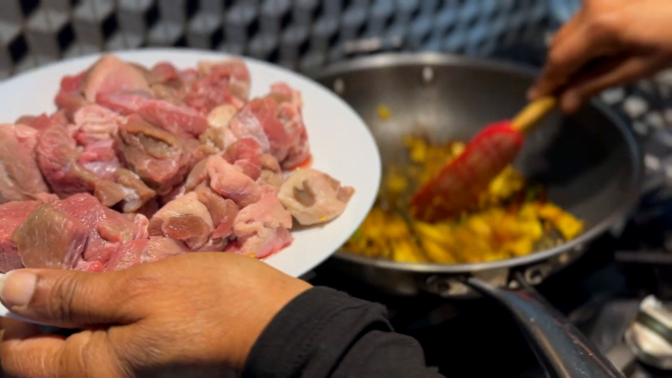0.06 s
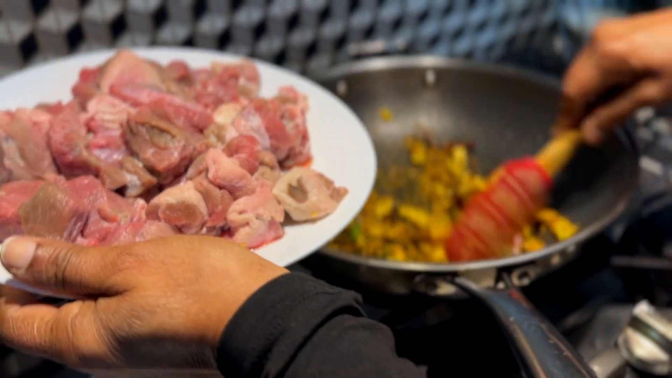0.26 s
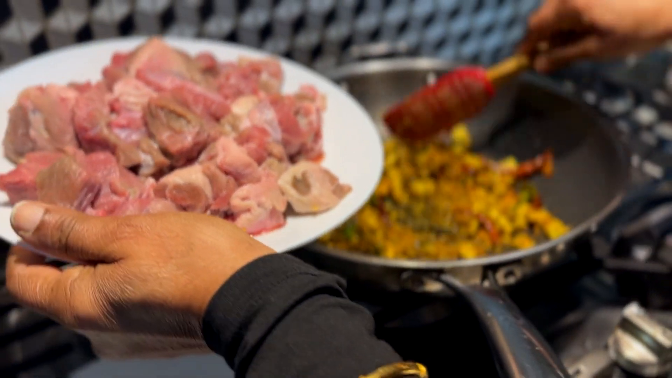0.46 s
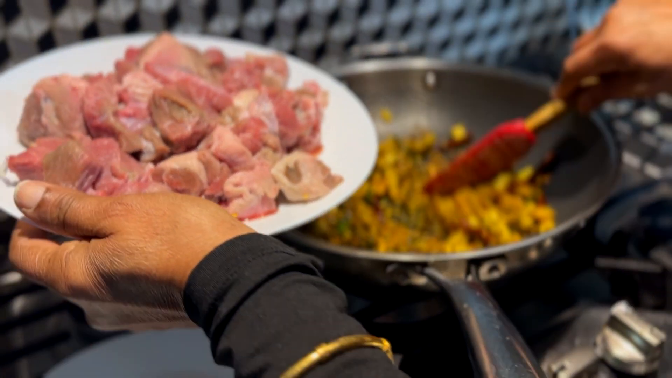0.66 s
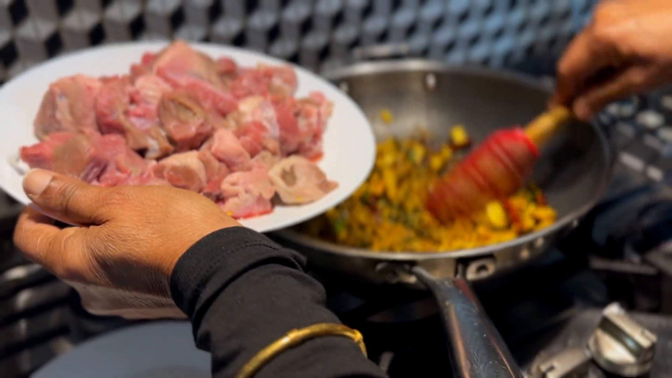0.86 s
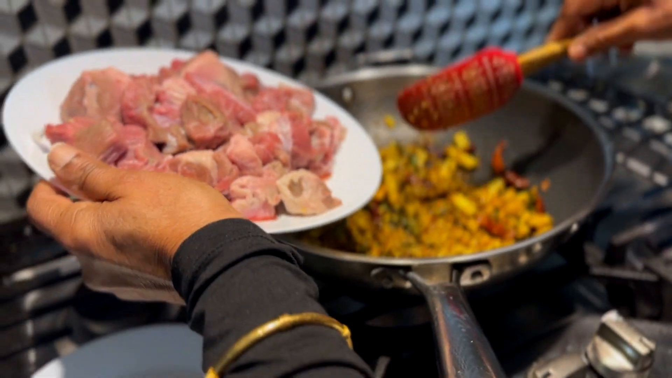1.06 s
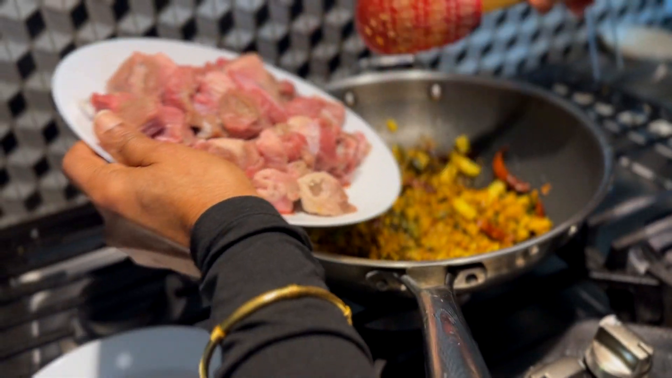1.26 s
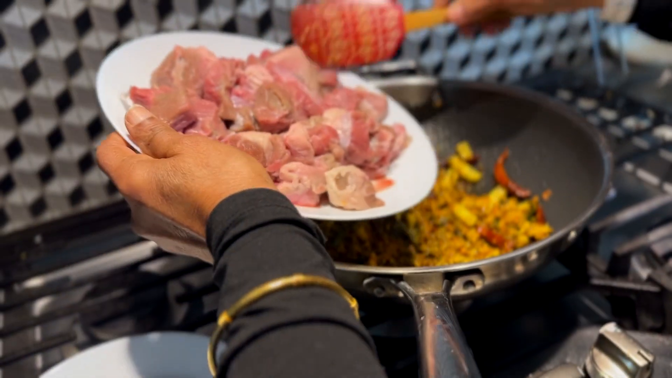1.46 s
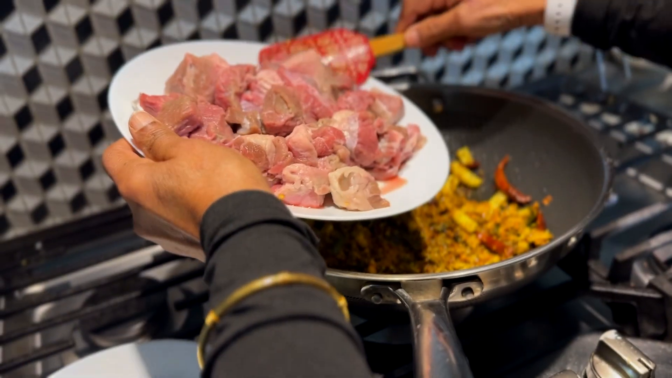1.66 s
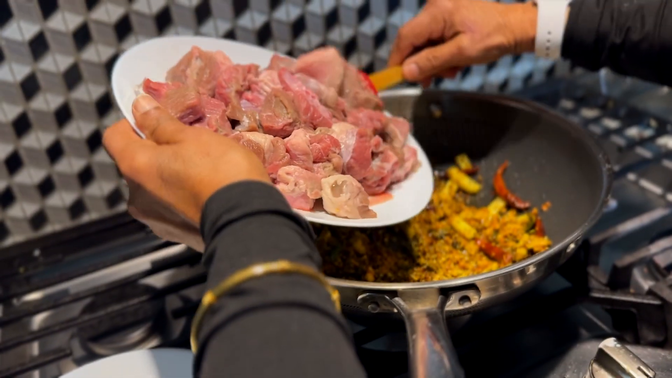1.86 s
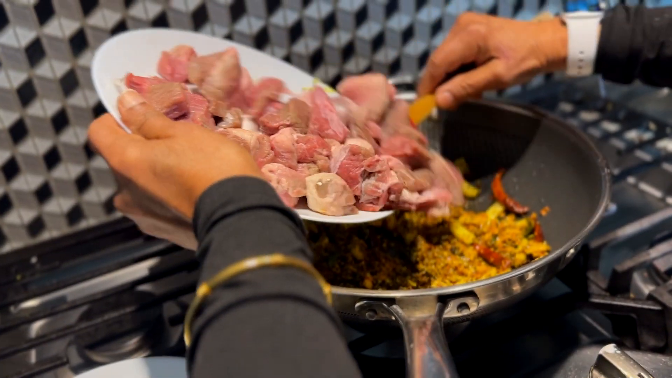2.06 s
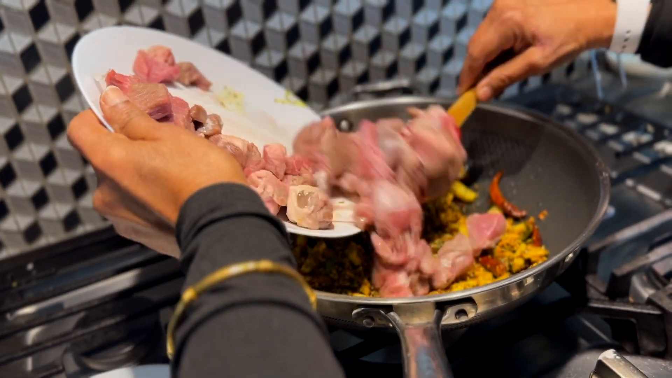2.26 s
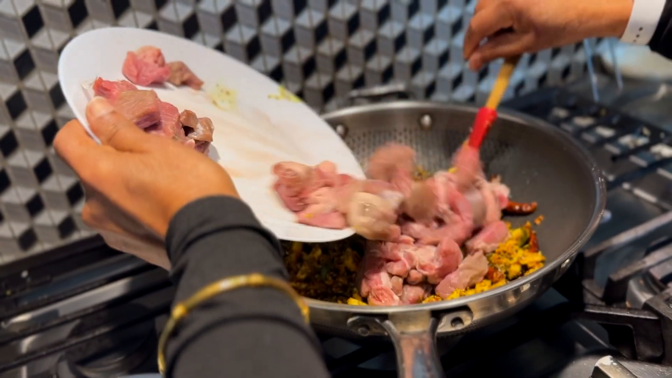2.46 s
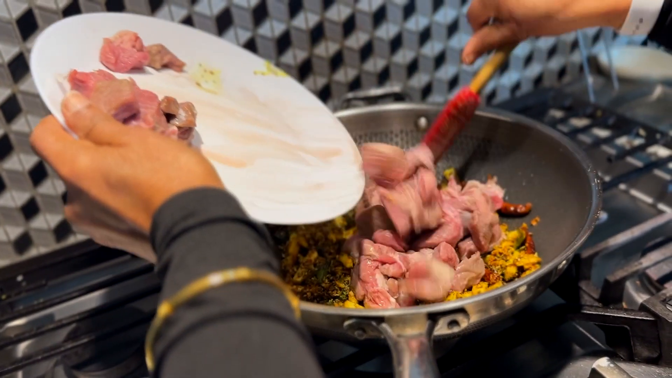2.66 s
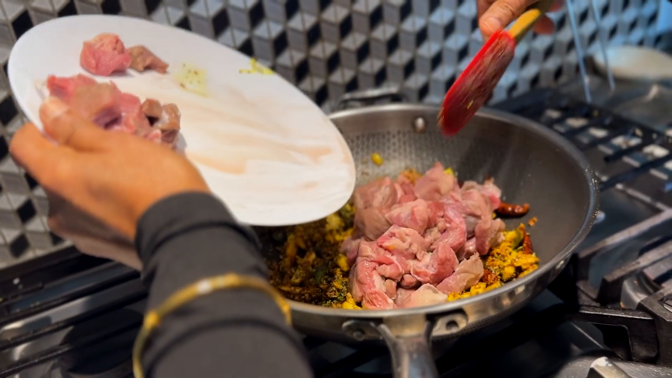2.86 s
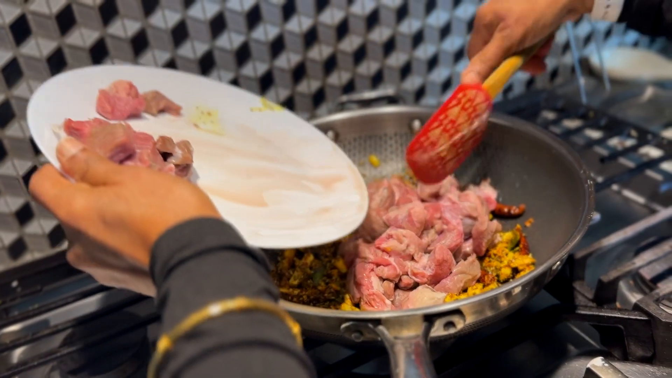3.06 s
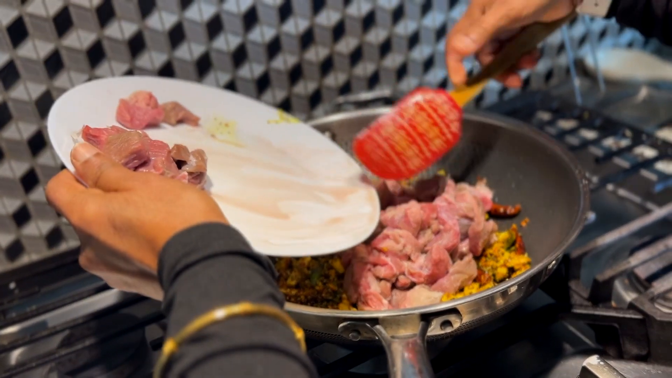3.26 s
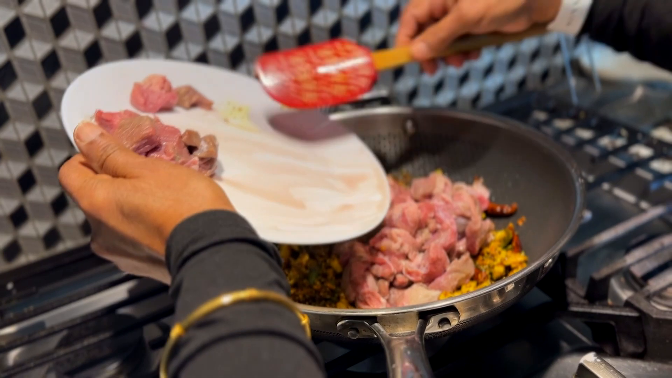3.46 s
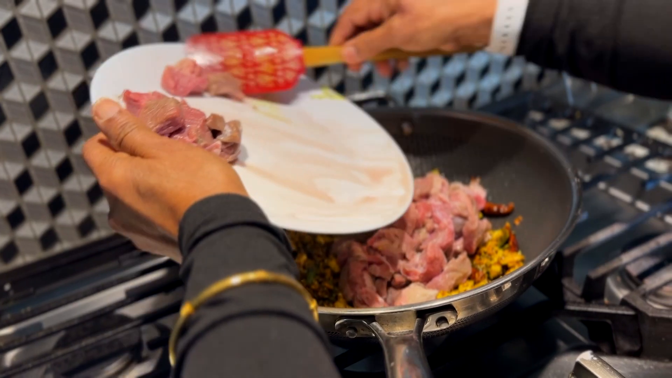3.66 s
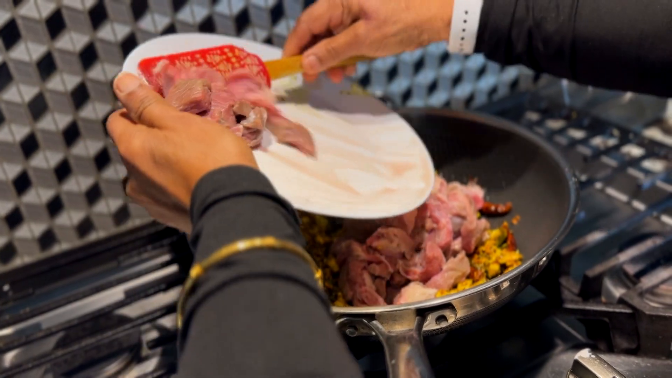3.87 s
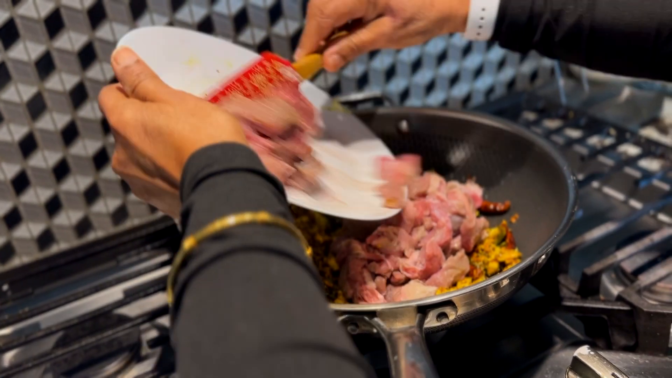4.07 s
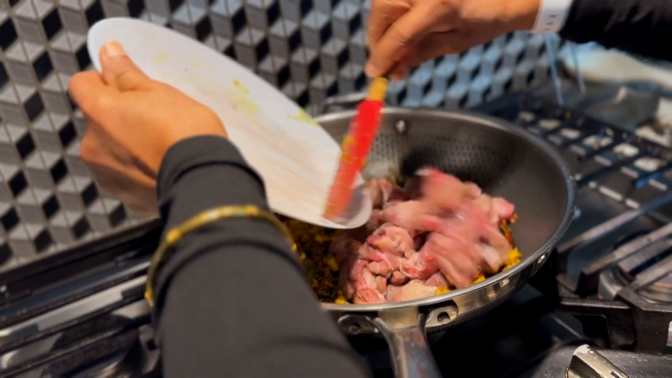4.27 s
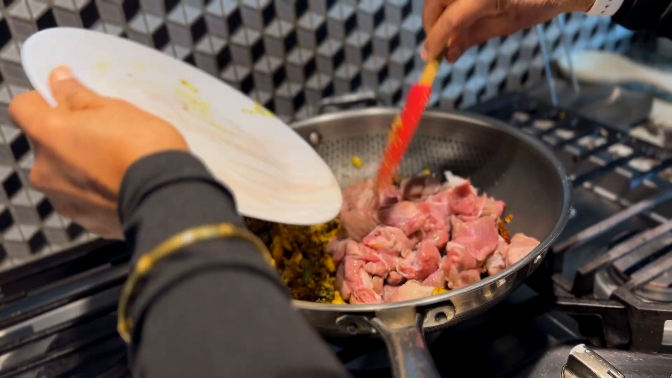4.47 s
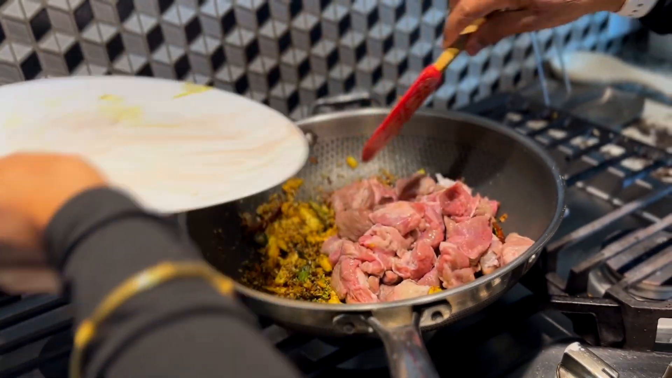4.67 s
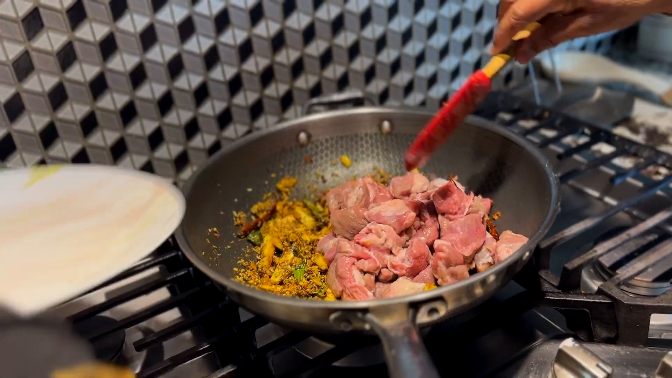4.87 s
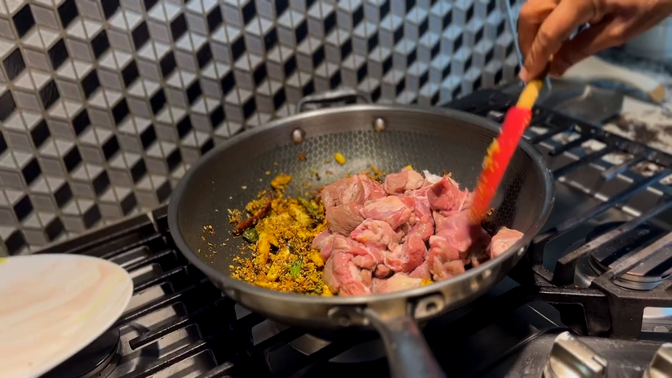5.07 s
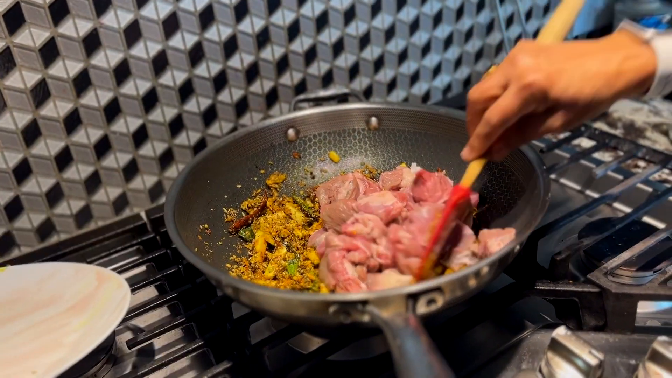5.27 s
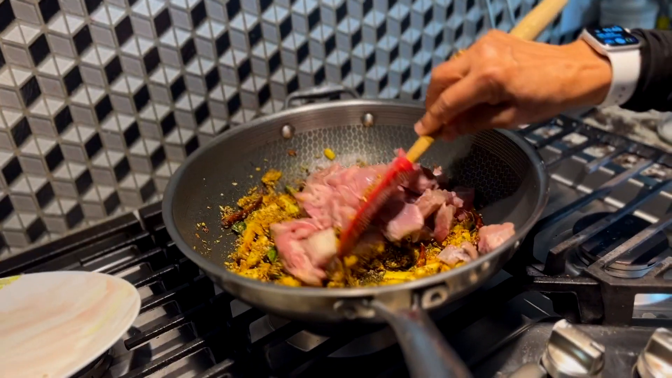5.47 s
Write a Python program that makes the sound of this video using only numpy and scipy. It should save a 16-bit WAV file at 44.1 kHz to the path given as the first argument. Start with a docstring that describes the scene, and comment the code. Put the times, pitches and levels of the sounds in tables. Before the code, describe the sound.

A low oily crackle with stirring strokes and a brief steam whistle swells abruptly into strong, steady frying over a faint kitchen fan.

```python
"""Spices sizzle in an oily pan; wet meat slides in and the sizzle grows loud and dense.
The sizzle is five sizes of bursting steam bubbles over hiss; a spatula stirs, rubs and catches on the pan.
Droplets spit with a click and a hiss, soft lumps thud, and steam whistles from a pocket as a wavering tone.
The pan rumbles on its grate; an extractor fan rushes and hums. One microphone feeds both channels."""
import sys
import numpy as np
from scipy import signal
from scipy.fft import rfft, irfft, next_fast_len
from scipy.io import wavfile
from scipy.ndimage import uniform_filter1d, map_coordinates

SR = 44100
rng = np.random.default_rng(int(sys.argv[2]) if len(sys.argv) > 2 else 0)


def bounce(signal):
    """Save signal as a 16-bit WAV file at the path given by the first command-line argument."""
    frames = np.transpose(np.atleast_2d(signal))
    limited = np.clip(frames, -1, 1)
    pcm = np.round(limited * 32767).astype(np.int16)
    wavfile.write(sys.argv[1], SR, pcm)


N = 243599  # length [samples]
TIME_S = np.arange(N) / SR


def amp(db):
    """Gain of a dB value."""
    return 10 ** (np.asarray(db) / 20)


def unit(x):
    """x scaled to an rms of 1."""
    return x / np.sqrt(np.mean(x ** 2) + 1e-20)


def along(points, hz):
    """Read a curve of (Hz, value) points on a log frequency axis."""
    point_hz, value = np.transpose(points)
    return np.interp(np.log(hz + 1), np.log(point_hz + 1), value)


def curves(rows):
    """One value per sample for each column after the time."""
    s, *columns = np.transpose(rows)
    return [np.interp(TIME_S, s, column) for column in columns]


def wobble(rate):
    """A smooth random curve with rate random points a second."""
    points = rng.standard_normal(int(N * rate / SR) + 4)
    return map_coordinates(points, [np.arange(N) * rate / SR])


def filtered(x, response):
    """x shaped by a response, which is a function of frequency."""
    size = next_fast_len(N + SR // 2)
    spectrum = rfft(x, size) * response(np.fft.rfftfreq(size, 1 / SR))
    return irfft(spectrum, size)[..., :N]


def resonance(f, hz, width_hz):
    """A body that rings at one pitch: a causal band-pass of peak gain 1."""
    return 1j * f * width_hz / (hz * hz - f * f + 1j * f * width_hz)


def add(track, s, sound):
    """Mix sound into track from time s."""
    track[round(s * SR):][:len(sound)] += sound


def patchy(depth_db, streak_db=0, sound=None):
    """Noise (or sound) with broad brief patches of strength, and narrow lasting streaks."""
    source = rng.standard_normal(N) if sound is None else sound
    z = signal.stft(source, nperseg=512)[2]

    def field(bins, frames):
        """Random strengths, smoothed over frequency bins and time frames."""
        over_pitch = uniform_filter1d(rng.standard_normal(z.shape), bins, 0)
        return unit(uniform_filter1d(over_pitch, frames, 1))

    gain_db = depth_db * field(bins=14, frames=6) + streak_db * field(bins=1, frames=30)
    return signal.istft(z * amp(gain_db), nperseg=512)[1][:N]


def bubbles(count, pitch_hz, spread, cycles, size_db):
    """Bursting bubbles: damped sines of scattered pitch; size_db above 0 makes a few louder than most."""
    start = rng.integers(0, N, count)[:, None]
    hz = pitch_hz * np.exp(spread * rng.standard_normal((count, 1)))
    hz = np.minimum(hz, SR / 2.5)
    size = amp(size_db * np.minimum(rng.exponential(1, (count, 1)), 6))
    size = size * rng.choice([-1, 1], (count, 1))
    k = np.arange(96)  # samples in one burst
    turns = hz * k / SR
    grain = size * np.sin(2 * np.pi * turns) * np.exp(-turns / cycles)
    return np.bincount((start + k).ravel(), grain.ravel())[:N]


# How hard the pan fries:
# (time [s], big bubbles in the bowl [dB], fizz before its split [dB], fine spray [dB])
FRYING = [(0, -44.5, -40, -45), (1.0, -47.5, -40, -40), (1.5, -49, -40, -45), (2.1, -48.5, -42, -45),
          (2.24, -47, -37, -43.5), (2.5, -34.5, -27, -31), (2.8, -31, -24.5, -28.5),
          (2.92, -34.5, -28, -30), (3.16, -30, -25, -29.5), (3.4, -31, -26.5, -29),
          (3.75, -31.5, -24.5, -31), (3.95, -32.5, -25, -31), (4.25, -31.5, -25.5, -34.5),
          (4.42, -30.5, -25, -26.5), (4.65, -30, -24, -25), (5.05, -33.5, -25, -26),
          (5.36, -32, -23, -28.5), (5.52, -33.5, -23.5, -28)]
# Tone colours of the five bubble sizes, biggest first: (frequency [Hz], relative level [dB per Hz])
DEEP = [(450, -31), (600, -6.5), (900, -3), (1400, 0.5), (1700, 3), (2200, -21)]  # in the meat's juice
BOWL = [(500, -24.5), (700, -16.5), (1000, -10.5), (2000, -1), (3200, 1), (4200, -4.5), (6000, -38)]
DULL = [(2500, -42.5), (3400, -6), (5000, 0), (6300, 0), (8000, -2.5), (11000, -30)]  # fizz of larger bubbles
BRIGHT = [(4000, -33), (6000, -6.5), (7300, -1), (8500, 0.5), (10000, 0), (11200, -5), (13000, -21)]  # fizz of smaller bubbles
SPRAY = [(8500, -38), (10300, -0.5), (11500, 3.5), (13000, 4), (15000, 6), (15700, 4), (16500, 2.5)]
# Pitches at which the pan rings: (frequency [Hz], width [Hz], level before a common trim [dB])
PAN = [(1085, 87, 6.5), (1399, 18.5, 10), (2030, 30, 3), (2655, 190, -4), (2990, 53, 3), (5510, 210, -8.5),
       (5790, 54, -12)]
PAN_TRIM_DB = -4.5
DULL_DB, BRIGHT_DB = -4.5, -2.5  # the two parts of the fizz, against the fizz level
SPRAY_FOLLOWS = 0.69  # share of the fizz flare that the spray reaches by the end of a stroke
# Juice bubbles start below the bowl's level and grow against it as the meat releases juice
JUICE_FROM_S, JUICE_DB, JUICE_DB_PER_S = 3.3, -12.5, 2.5
DRIFT_DB = 0.03  # how far each layer wanders on its own


def sizzle():
    """Steam bubbles of five sizes burst over hiss, ring the pan and surge together as steam breaks out."""
    bowl_db, fizz_db, spray_db = curves(FRYING)
    flare_db, big_db, tilt_db = np.transpose(STROKES)[2:5]
    bowl_db = bowl_db + strokes(big_db)
    fizz_db = fizz_db + strokes(flare_db)
    bright_db = strokes(tilt_db)  # shifts fizz from dull to bright
    spray_db = spray_db + SPRAY_FOLLOWS * strokes(flare_db, lean=.7)
    juice_db = bowl_db + JUICE_DB + JUICE_DB_PER_S * np.maximum(TIME_S - JUICE_FROM_S, 0)
    surge = 0.11 * wobble(6.8) + 0.63 * wobble(45) + .5 * wobble(160)  # dB, scaled for each layer

    def ring(f):
        """The direct sound plus the pan's resonances."""
        return 1 + sum(amp(db + PAN_TRIM_DB) * resonance(f, hz, width) for hz, width, db in PAN)

    # (level [dB], tone colour, patch depth [dB], share of power from bubbles, bubbles)
    layers = [
        (bowl_db + 0.41 * surge, BOWL, .8, .35,
         bubbles(count=12000, pitch_hz=2157, spread=0.43, cycles=0.78, size_db=2.5)),
        (fizz_db + DULL_DB - bright_db + 1.06 * surge, DULL, .9, .4,
         bubbles(count=14000, pitch_hz=5110, spread=0.31, cycles=5.4, size_db=0.5)),
        (fizz_db + BRIGHT_DB + bright_db + 1.0 * surge, BRIGHT, .9, .4,
         bubbles(count=18000, pitch_hz=8210, spread=0.265, cycles=3.3, size_db=0.0)),
        (spray_db + 1.0 * surge, SPRAY, .9, .4,
         bubbles(count=20000, pitch_hz=12800, spread=0.31, cycles=2.1, size_db=0.0)),
        (juice_db + 0.66 * surge, DEEP, .8, .35,
         bubbles(count=6000, pitch_hz=1326, spread=0.42, cycles=1.5, size_db=3.0))]
    out = np.zeros(N)
    for db, colour, patchy_db, share, grains in layers:
        def shaped(x):
            """x in this layer's colour, ringing the pan."""
            return unit(filtered(x, lambda f: amp(along(colour, f)) * ring(f)))

        hiss = rng.standard_normal(N)
        oil = np.sqrt(share) * shaped(grains) + np.sqrt(1 - share) * shaped(hiss)
        streaked = unit(patchy(patchy_db, streak_db=2.4, sound=oil))
        out += amp(db + DRIFT_DB * wobble(9)) * streaked
    return out


# The spatula turns food onto hot oil: (start time [s], length [s], fizz flare [dB],
# big bubble flare [dB], brightness shift [dB], rub level [dB], blade rasp level [dB])
STROKES = [(-.06, 0.086, 5.5, 7, -1, -44, -62), (0.032, 0.094, 2.5, -13, -3.5, -57, -52),
           (0.216, 0.16, 7.5, 4.5, -0.5, -39.5, -42.5), (0.388, 0.09, 2.5, -1, -0.5, -60, -42.5),
           (0.547, 0.17, 7, 4, -1.5, -46.5, -51), (0.826, 0.077, 6.5, 5, 0, -45, -51),
           (1.03, 0.047, 2, -6, -0.5, -66, -70), (5.188, 0.094, 4, 0, 0, -70, -70),
           (5.399, 0.049, 1.5, 4.5, -1, -70, -70)]
STROKE_ATTACK_S, STROKE_RELEASE_S = 0.051, 0.062


def strokes(column, lean=0):
    """Sum of all strokes' soft envelopes, each times its value; lean tilts the weight to the stroke's end."""
    out = np.zeros(N)
    for (s, length), value in zip(np.array(STROKES)[:, :2], column):
        rise = (TIME_S - s) / STROKE_ATTACK_S
        fall = 1 + (s + length - TIME_S) / STROKE_RELEASE_S
        shape = np.sin(np.pi / 2 * np.clip(np.minimum(rise, fall), 0, 1)) ** 2
        out += value * shape * np.clip((TIME_S - s) / length, 0, 1) ** lean
    return out


# What the rubbed pan rings with: (frequency [Hz], width [Hz], relative level [dB])
RUB = [(770, 390, -8.5), (1067, 51, 7), (1320, 240, -2.5), (1703, 73, 9)]
# Higher pitches woken by the blade's edge: (frequency [Hz], width [Hz], relative level [dB])
RASP = [(2300, 160, 1), (2630, 79, -3)]
# The blade catches on the pan: (time [s], level of the blow [dB])
TICKS = [(.078, -14), (0.131, -9), (.395, -14), (0.59, -19), (.874, -10)]
# The blade also drags lightly from the start: (end time [s], level [dB])
BLADE_RESTS = (0.69, -47)


def stir():
    """Rough friction noise and sharp blows ring the pan; rub and rasp grow towards a stroke's end."""
    low_db, rasp_db = np.transpose(STROKES)[5:]
    until_s, drag_db = BLADE_RESTS
    drag = amp(drag_db) * np.clip((until_s - TIME_S) / STROKE_RELEASE_S, 0, 1)
    friction = amp(2.9 * wobble(90.7)) * patchy(2.1)

    def rung(x, modes):
        """x through the pan's resonances, with alternating signs."""
        def response(f):
            return sum((-1) ** k * amp(db) * resonance(f, hz, width)
                       for k, (hz, width, db) in enumerate(modes))
        return filtered(x, response)

    blows = np.zeros(N)
    for s, db in TICKS:
        add(blows, s, amp([db]))  # a single-sample knock
    ticks = rung(blows, RUB + RASP)
    rub = (drag + strokes(amp(low_db), lean=1.0)) * unit(rung(friction, RUB))
    rasp = strokes(amp(rasp_db), lean=0.46) * unit(rung(friction, RASP))
    return ticks + rub + rasp


# Spitting droplets: (time [s], level [dB], centre frequency [Hz], hiss against that level [dB])
SPITS = [(0.0707, -24, 3940, -3), (0.145, -15, 14400, -16), (0.2252, -21.5, 8300, -7),
         (0.545, -17, 8200, -6), (0.7187, -23, 7650, -21), (0.959, -27, 8730, -5), (1.0344, -26, 9050, -10),
         (1.154, -23, 7120, -5.5), (1.29, -27, 8900, 0), (1.368, -22.5, 8280, -10), (1.4147, -30, 8820, -3),
         (1.7926, -30.5, 8700, 3.5), (2.019, -28, 10500, -7), (2.122, -24.5, 5670, -8),
         (2.1357, -25, 7110, -10), (2.1652, -34.5, 3800, 7.5), (2.172, -14.5, 4620, -27),
         (2.1927, -16, 5000, -24), (3.499, -20, 5360, -4), (3.535, -27, 5640, 1), (3.8784, -15, 5410, -11),
         (3.974, -14, 5380, -15), (4.163, -18.5, 7060, -1), (4.2234, -12, 5600, -12),
         (4.3555, -17.5, 5200, -2), (4.4787, -16, 5850, -2), (5, -16.5, 5070, -5), (5.4218, -17, 4240, -7),
         (5.465, -22.5, 2280, -1)]
CLICK_BODY_DB, CLICK_BODY_RATIO = -17.5, 0.56  # a lower ring under each click: level, pitch ratio
HISS_T60 = 0.059  # time for the hiss to fall by 60 dB [s]


def spits():
    """A droplet bursts with a click of a few cycles, then hisses off as steam."""
    out, t = np.zeros(N + SR), np.arange(SR // 8) / SR
    for s, db, hz, hiss_db in SPITS:
        click = 2.3 * np.sin(2 * np.pi * hz * t) * np.exp(-hz * t / 2.8) * (1 - np.exp(-hz * t / .5))
        body = np.sin(2 * np.pi * CLICK_BODY_RATIO * hz * t) * np.exp(-hz * t / 3)
        click += amp(CLICK_BODY_DB) * body
        band = signal.butter(1, [hz * 0.68, min(hz * 1.45, SR * .45)], "band", fs=SR)
        hiss = unit(signal.lfilter(*band, rng.standard_normal(len(t))))
        hiss = hiss * amp(-60 * t / HISS_T60) * (1 - np.exp(-t / 0.0017))
        add(out, s, amp(db) * (click + amp(hiss_db) * hiss))
    return out[:N]


# Soft lumps on the pan: (time [s], peak level [dB], frequency [Hz], half length [s])
THUDS = [(2.8378, -26, 380, .0009), (2.8815, -12, 235, .0009)]


def thuds():
    """A soft push of about one cycle; the hob shakes after it at a low pitch."""
    out, t = np.zeros(N + SR), np.arange(SR // 50) / SR - 1 / 100
    for s, db, hz, half in THUDS:
        push = -np.cos(2 * np.pi * hz * t) * np.exp(-np.abs(t / half) ** 1.15 / 2)
        add(out, s - 1 / 100, amp(db) * push)
    pushes = out[:N]
    return pushes + amp(1.5) * filtered(pushes, lambda f: resonance(f, 105, 40))


# Steam leaving a pocket, before puffs and wavering: (time [s], frequency [Hz], level [dB])
WHISTLE = [(.7, 1320, -46), (.82, 1240, -44), (.88, 1290, -39.5), (.925, 1380, -46), (1.05, 1399, -44.5),
           (1.13, 1450, -46.5), (1.24, 1385, -54)]
# The jet puffs: (time [s], level over the tone [dB], half length [s])
PUFFS = [(0.846, 6, 0.013), (0.925, 14, .009), (0.94, 10, 0.0057), (0.976, 12, 0.021), (1.03, 14, 0.0079),
         (1.057, 10, 0.0064), (1.087, 9.5, .016), (1.135, 5, 0.0065)]


def whistle():
    """An unsteady steam jet: the tone puffs, sputters and wavers, with a faint octave."""
    hz, db = curves(WHISTLE)
    db = db + sum(over_db * np.exp(-((TIME_S - s) / half) ** 4) for s, over_db, half in PUFFS)
    edge_s = np.minimum(TIME_S - WHISTLE[0][0], WHISTLE[-1][0] - TIME_S)
    on = np.clip(edge_s / 0.024, 0, 1)  # fades in and out
    phase = 2 * np.pi * np.cumsum(hz + 18 * wobble(140)) / SR
    tone = np.sin(phase) + amp(-18) * np.sin(2 * phase)
    return on * amp(db + 2.4 * wobble(70.3)) * tone


# The pan rocks on its grate under the spatula or the load: (time [s], level [dB], half length [s])
ROCKING = [(0.016, -36, 0.057), (0.315, -43.5, 0.13), (2.443, -49, 0.062), (4.374, -51, 0.073),
           (5.3, -53, 0.075)]
# Low pitches of the grate: (frequency [Hz], width [Hz], relative level [dB])
GRATE = [(92, 6.1, 4), (184, 8.1, 2)]


def rocking():
    """Each rocking movement swells a low rumble: noise through the grate's resonances."""
    force = sum(amp(db) * np.exp(-((TIME_S - s) / half) ** 2) for s, db, half in ROCKING)

    def grate(f):
        return sum(amp(db) * resonance(f, hz, width) for hz, width, db in GRATE)

    return force * unit(filtered(rng.standard_normal(N), grate))


KITCHEN_T60 = 0.23  # time for the echo to fall by 60 dB [s]


def kitchen(x):
    """Short diffuse answer of tiles and hood: many tiny echoes as fading noise."""
    t = np.arange(SR // 3) / SR
    tail = rng.standard_normal(len(t)) * amp(-60 * t / KITCHEN_T60) * (t > .003)
    return signal.fftconvolve(x, tail / np.linalg.norm(tail))[:N]


# Tone colour of the fan's air: (frequency [Hz], relative level [dB per Hz])
FAN = [(40, -45), (55, -28), (70, -30), (85, -6.5), (130, -10.5), (170, -17.5), (210, -16), (300, -16.5),
       (400, -32.5), (450, -35.5), (560, -18.5), (800, -27), (1150, -25), (1600, -24.5), (3000, -40)]
FAN_DB = -49.5  # level of the air rush
# Motor and duct tones: (frequency [Hz], filter width [Hz], level before the noise and sine weights [dB])
HUM = [(60.3, 0.66, -62), (115.7, 10.5, -46), (203.6, 15, -49), (362.6, 14.4, -54), (1164, 17, -50.5)]


def fan():
    """Air rush, with narrow bands of noise at the motor and duct tones; the two lowest hold a steady sine."""
    air = unit(filtered(patchy(1.68), lambda f: amp(along(FAN, f))))
    out = amp(FAN_DB + 0.78 * wobble(3.06)) * air
    for hz, width_hz, db in HUM:
        fuzz = unit(filtered(rng.standard_normal(N), lambda f: resonance(f, hz, width_hz) ** 2))
        steady = (hz < 150) * np.sin(2 * np.pi * hz * TIME_S)
        out += amp(db) * (.33 * fuzz + 1.3 * steady)
    return out


def scene():
    """All sources reach one microphone; spits, thuds and whistle also echo in the kitchen."""
    near = spits() + thuds() + whistle()
    mono = sizzle() + stir() + near + amp(-14.5) * kitchen(near) + rocking() + fan()
    return np.array([mono, mono])


TOP_HZ = 15740  # nothing is kept from here up


def record(dry):
    """Steep bass roll-off of the microphone around 58 Hz, then the band limit."""
    return filtered(dry, lambda hz: (hz < TOP_HZ) * (hz ** 6 / (58 ** 6 + hz ** 6)))


dry = scene()
out = record(dry)
bounce(out)
```